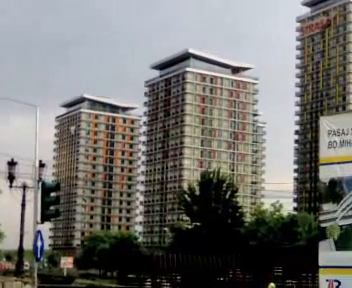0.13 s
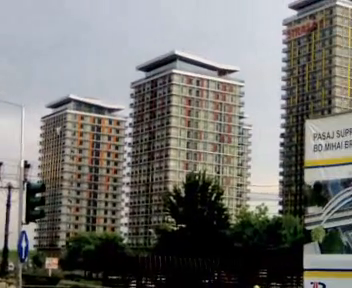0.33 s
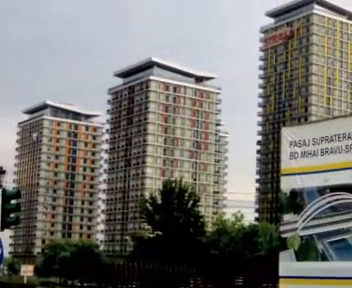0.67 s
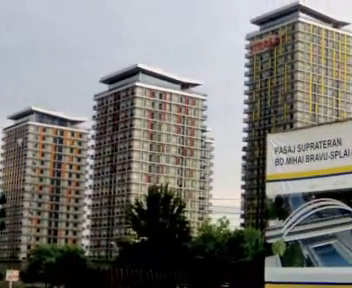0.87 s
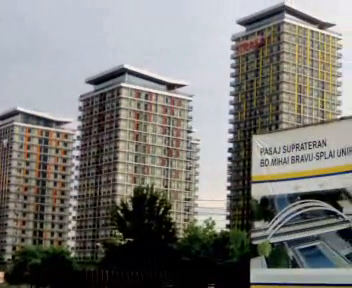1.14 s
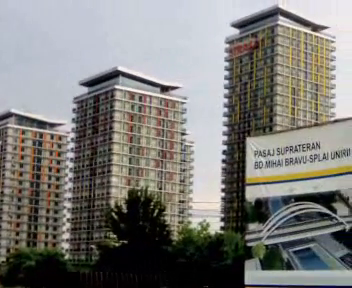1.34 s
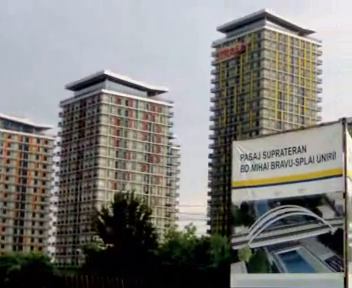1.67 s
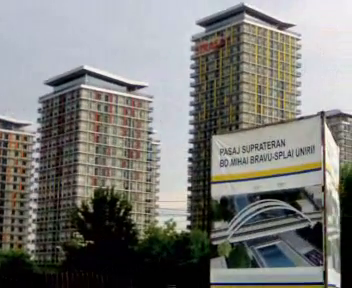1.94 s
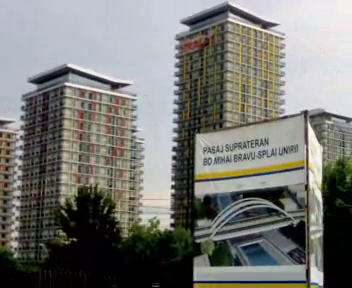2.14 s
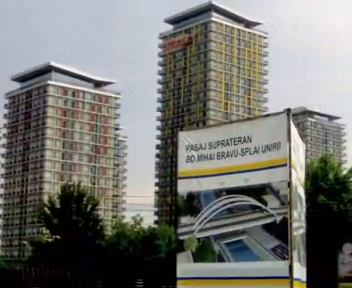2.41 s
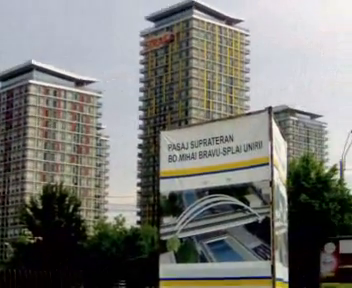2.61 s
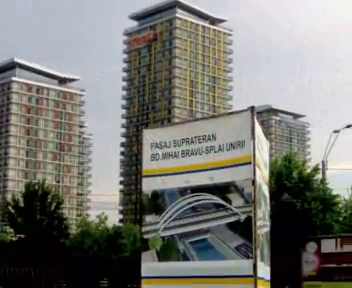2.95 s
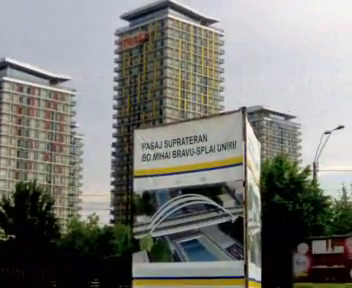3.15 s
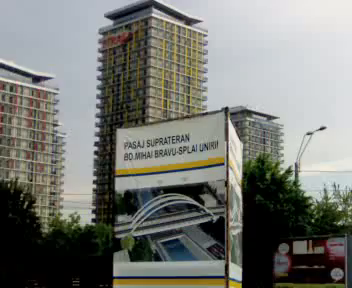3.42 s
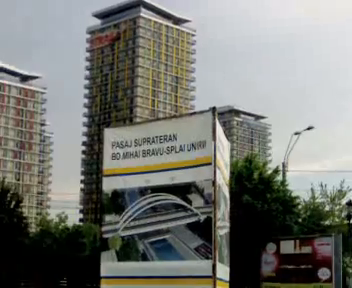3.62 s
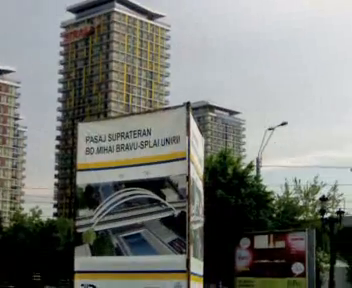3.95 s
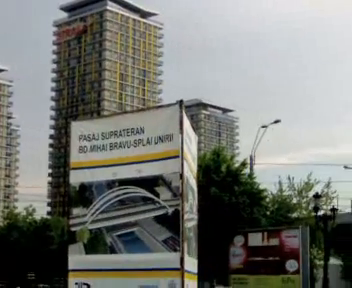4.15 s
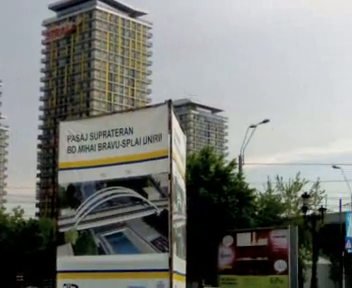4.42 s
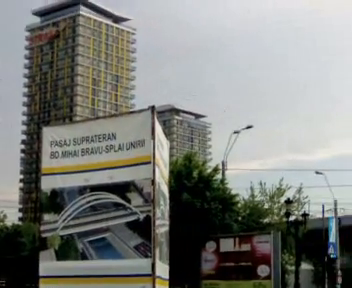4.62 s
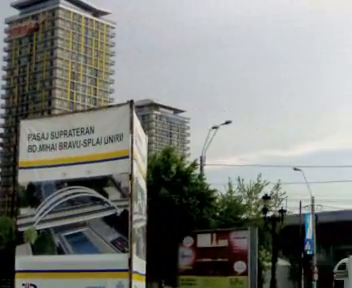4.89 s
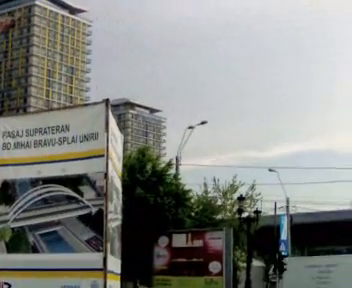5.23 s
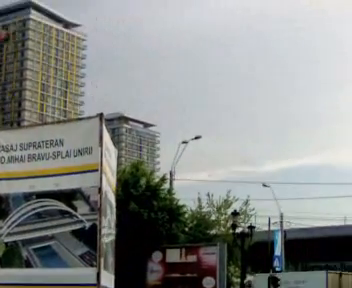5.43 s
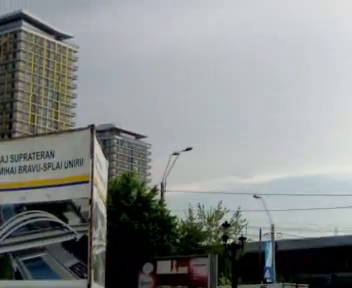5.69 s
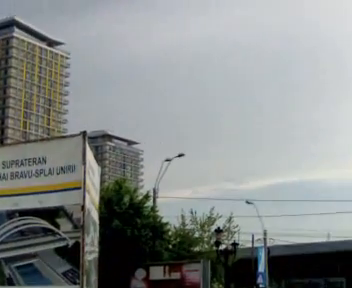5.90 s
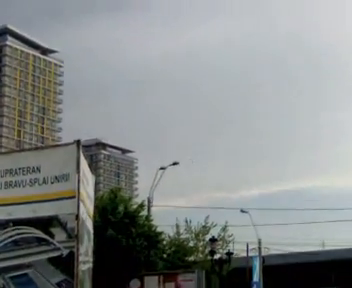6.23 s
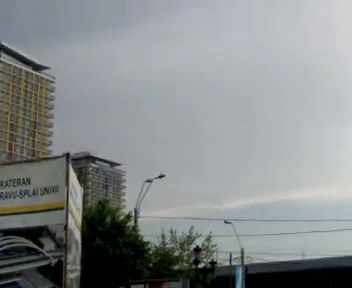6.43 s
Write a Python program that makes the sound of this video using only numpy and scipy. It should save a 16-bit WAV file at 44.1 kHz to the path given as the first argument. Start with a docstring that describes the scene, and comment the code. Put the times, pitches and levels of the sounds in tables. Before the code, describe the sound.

Traffic passes on a rainy street with swelling spray and clacking wheels, fading to a low engine drone and faint raindrop ticks.

```python
"""Traffic on a wet city road.

Heard from the pavement: tyres roar and throw hissing spray as cars go by. Two pass close,
their hiss Doppler-shifted and comb-swept by a reflection. Wheels clatter over a road joint
and raindrops tick nearby. Late on, a car engine swells and fades; a lorry draws up and drones."""
import sys
import numpy as np
from scipy import signal
from scipy.fft import rfft, irfft, next_fast_len
from scipy.io import wavfile
from scipy.ndimage import uniform_filter1d, map_coordinates

SR = 44100
rng = np.random.default_rng(int(sys.argv[2]) if len(sys.argv) > 2 else 0)


def generate_wav(signal):
    """Clip the signal to [-1, 1] and save it as 16-bit WAV at the path in sys.argv[1]."""
    frames = np.transpose(np.atleast_2d(signal))
    scaled = np.clip(frames, -1, 1) * 32767
    pcm = np.round(scaled).astype(np.int16)
    wavfile.write(sys.argv[1], SR, pcm)


N = 289296

# Each row: closest approach in seconds, half-length in seconds, tyre, water and mist levels in dB.
CAR_PASSES = [(1.06, 0.38, -28, -24.5, -28), (2.02, 0.12, -46, -32, -51.5), (3.599, 0.56, -25.5, -25, -25),
              (4.56, 0.18, -36.5, -29.5, -43.5), (5.75, 1, -57.5, -36, -44)]
# Distant traffic, thinning out. Each row: time in seconds, level in dB.
FAR_TRAFFIC = [(0, -23.5), (2.7, -25.5), (4.3, -28.5), (5.5, -32), (6.56, -33)]
# Heavy bodies on uneven road. Each row: peak time in seconds, half-length in seconds, level in dB.
BODY_BOOMS = [(0.101, 0.18, -35), (.75, 0.29, -40.5), (2.3, 0.3, -34), (3.22, .17, -32)]
# Tyre and water noise. Each row: frequency in Hz, relative spectral density in dB.
BOOM_SPECTRUM = [(12, -31.5), (26, 4.5), (42, -10.5), (60, 1), (80, -7), (115, -31)]
RUMBLE_SPECTRUM = [(35, -4.5), (65, 0), (97, -5), (135, -3), (180, -5), (290, -6.5), (420, -9.5),
                   (560, -7.5), (800, -44)]
ROLL_SPECTRUM = [(330, -19), (520, -15.5), (630, -2.5), (720, -0.5), (900, -3), (1100, -5.5), (1500, -27.5),
                 (2500, -65.5)]
TREAD_SPECTRUM = [(400, -39), (750, -14), (1000, -9.5), (1200, -3), (1480, -1.5), (1720, -1.5), (1950, -5),
                  (2350, -6.5), (2900, -15), (4000, -30.5), (7000, -54)]
SPLASH_SPECTRUM = [(900, -17), (1800, -2.5), (2500, 0), (3100, 0), (3700, -3), (4400, -3), (5200, -9.5),
                   (6500, -17), (7400, -45)]
HISS_SPECTRUM = [(2500, -52), (3900, -11.5), (4550, -1), (5020, 1.5), (5300, -2), (5750, -0.5),
                 (6200, -5.5), (6800, -12), (7400, -29.5)]
MIST_SPECTRUM = [(3500, -34.5), (4800, -6.5), (5500, 0), (6200, -4.5), (6700, -8.5), (7150, -10),
                 (7450, -17)]
DROPLET_SPECTRUM = [(600, -20.5), (1600, -7.5), (3500, -2), (5200, 3.5), (6300, -7.5), (7400, -31)]
# Resonances. Each row: centre in Hz, width in Hz, relative gain in dB.
TREAD_BAND = [(1508, 460, 0)]
HISS_BAND = [(5110, 570, 0)]
JOINT_MODES = [(748, 160, 1.5), (927, 120, 4.5), (1420, 210, 6.5), (1750, 290, -4), (2560, 880, -7)]
# Tyres cutting standing water. Each row: peak time in seconds, half-length in seconds, level in dB.
PUDDLES = [(0.661, 0.079, -24), (0.814, .026, -25.5), (1.208, 0.07, -30), (1.363, 0.15, -27.5),
           (1.826, 0.055, -32.5), (3.654, 0.039, -23.5), (3.926, 0.093, -27.5)]
# Pitch fall of the hiss. Each row: midpoint in seconds, half-length in seconds, peak shift as a fraction.
DOPPLER_FALLS = [(1.02, .16, .055), (3.46, .22, .018)]
# Spray reflections. Each row: peak time in seconds, Gaussian sigma in seconds, lag at the peak in ms,
# closing rate in ms per second, signed gain.
REFLECTIONS = [(.85, .2, .63, 1.4, .32), (.9, .11, .183, -1.3, -.22), (3.32, .17, .34, 1.05, -.24),
               (3.42, .13, .41, 1.1, -.13)]
# Wheel hits on the joint. Each row: start in seconds, clack, crack and thud levels in dB, thud in Hz.
JOINT_HITS = [(0.047, -26.5, -26.5, -21, 100), (0.057, -24, -26, -30, 139), (0.070, -12.5, -15, -21, 85),
              (0.086, -13, -19.5, -15, 120), (0.099, -18, -16.5, -13.5, 138),
              (0.135, -27.5, -23.5, -37, 150), (0.210, -16, -22, -24, 227), (0.220, -21.5, -18, -27.5, 130),
              (0.235, -38, -40.5, -20, 134), (0.258, -25, -27, -28, 204), (2.043, -18, -19, -29, 186),
              (2.073, -23, -20.5, -20.5, 118), (2.117, -17, -22.5, -37, 190), (2.149, -20, -27, -27, 230),
              (2.164, -28.5, -25, -18, 153), (2.235, -13, -15.5, -24, 251), (2.241, -23.5, -15, -18, 199),
              (2.256, -15.5, -24, -22.5, 150), (2.322, -14, -20.5, -33, 273), (2.329, -26, -21.5, -26, 200),
              (2.342, -12.5, -17.5, -20.5, 288), (2.361, -26, -13.5, -20.5, 172),
              (2.384, -22, -25, -26, 248), (2.429, -19, -32, -26, 232), (2.516, -20, -25, -27, 180),
              (2.543, -34, -29, -19.5, 137), (2.565, -15, -33.5, -23, 190), (3.298, -26, -19.5, -26, 183),
              (3.631, -30.5, -12.5, -37.5, 150)]
# Contact filters: rubber dulls, the edge sharpens. Each row: frequency in Hz, relative gain in dB.
RUBBER_CONTACT = [(200, -5), (540, -5), (720, -3), (960, -3), (1400, -17), (3000, -30.5), (7000, -48.5)]
EDGE_CONTACT = [(400, -22), (900, -20), (1400, 4.5), (2700, 2), (3600, -9), (7000, -29.5)]
# Each row: peak time in seconds, Gaussian sigma in seconds, centre in Hz, width in Hz, level in dB.
TREAD_TONES = [(0.804, 0.22, 1060, 222, -29.5), (1.261, 0.11, 1450, 520, -24),
               (2.251, 0.25, 762, 172, -33.5), (3.059, 0.32, 1610, 427, -30.5),
               (3.438, 0.17, 590, 145, -31.5), (4.835, 0.33, 1460, 427, -34.5)]
# Each row: start in seconds, level in dB, centre in Hz, 60 dB decay time in seconds.
NEAR_DROPS = [(1.4747, -13, 1980, .012), (1.793, -15.5, 4850, 0.021), (2.4682, -20.5, 5000, 0.017),
              (5.429, -24, 2200, 0.011), (5.451, -27, 4970, 0.015), (5.770, -26.5, 5520, 0.061),
              (6.375, -26.5, 5560, .014)]
# Each row: time in seconds, level in dB.
CAR_ENGINE_LEVEL = [(3.25, -58), (3.42, -30.5), (3.6, -29.5), (3.68, -37), (3.78, -27.5), (3.97, -30.5),
                    (4.11, -35), (4.2, -32), (4.55, -35), (4.88, -41), (4.98, -60)]
# Exhaust harmonics. Each row: multiple of the firing rate, relative level in dB.
CAR_ORDERS = [(1, -1), (2, -13.5), (3, -12.5), (5, -20)]
LORRY_ORDERS = [(1, -2.5), (2, -25), (4, -14)]
# Parts of a pass. Each triple: lead on the car in half-lengths, width ratio, gain in dB.
RUMBLE_SWELL, ROLL_SWELL, TREAD_SWELL = (0.47, 1, -9.5), (0.16, 1, -5), (-0.055, 1, -1.9)
SPLASH_SWELL, HISS_SWELL = (-0.03, 0.92, -0.73), (-0.054, 1.02, 0)
MIST_SWELL, WAKE_SWELL = (0.93, 0.76, 0), (-0.74, 0.2, -4)

TIME_S = np.arange(N) / SR


def amp(db):
    """Decibels to gain."""
    return 10 ** (np.asarray(db) / 20)


def unit_rms(x):
    """Scale to rms 1."""
    return x / np.sqrt(np.mean(x ** 2) + 1e-20)


def level_curve_db(points):
    """Interpolate (s, dB) points per sample."""
    return np.interp(TIME_S, *np.transpose(points))


def wobble(rate_hz):
    """Smooth random curve, rate_hz knots per second."""
    knots = rng.standard_normal(int(N * rate_hz / SR) + 4)
    return map_coordinates(knots, [TIME_S * rate_hz])


def filtered(x, response):
    """Apply a frequency response by FFT."""
    size = next_fast_len(N + SR // 2)
    return irfft(rfft(x, size) * response(np.fft.rfftfreq(size, 1 / SR)), size)[:N]


def coloured(x, spectrum):
    """Shape by (Hz, dB) points on a log frequency axis; rms 1."""
    points_hz, db = np.transpose(spectrum)
    return unit_rms(filtered(x, lambda hz: amp(np.interp(np.log(hz + 1), np.log(points_hz), db))))


def resonate(x, modes):
    """Parallel band-pass resonators; rms 1."""
    def response(hz):
        return sum(amp(db) * 1j * hz * width_hz / (centre_hz ** 2 - hz ** 2 + 1j * hz * width_hz)
                   for centre_hz, width_hz, db in modes)
    return unit_rms(filtered(x, response))


def band_noise(band):
    """Noise through the same resonance twice; rms 1."""
    return resonate(resonate(rng.standard_normal(N), band), band)


def rush(spectrum, patchy_db):
    """Coloured noise with random gain patches in time and frequency; rms 1."""
    bins = signal.stft(rng.standard_normal(N), nperseg=512)[2]
    patches = uniform_filter1d(rng.standard_normal(bins.shape), size=7, axis=0)
    patches = unit_rms(uniform_filter1d(patches, size=10, axis=1))
    noise = signal.istft(bins * amp(patchy_db * patches), nperseg=512)[1][:N]
    return coloured(noise, spectrum)


def patter(per_second, spread_db):
    """Droplet impacts of random time and size; rms 1."""
    sizes = amp(spread_db * np.minimum(rng.standard_exponential(N), 4))
    impacts = (rng.random(N) < per_second / SR) * sizes * rng.choice([-1, 1], N)
    return coloured(impacts, DROPLET_SPECTRUM)


def bursts(starts_s, levels_db, rise_s, t60_s):
    """Attack-decay envelopes, summed in power."""
    power, age_s = np.zeros(N + SR), np.arange(SR // 2) / SR
    attack = 1 - np.exp(-age_s / rise_s)
    for start_s, db in zip(starts_s, levels_db):
        power[round(start_s * SR):][:len(age_s)] += (amp(db - 60 * age_s / t60_s) * attack) ** 2
    return np.sqrt(power[:N])


def swells(sources, falloff=1.7):
    """Envelope of passing sources: pressure goes as distance ** -falloff, powers add."""
    power = np.zeros(N)
    for closest_s, half_s, db in sources:
        distance = np.hypot(1, (TIME_S - closest_s) / half_s)
        power += (amp(db) * distance ** -falloff) ** 2
    return np.sqrt(power)


def passing(cars, part):
    """Envelope of one part of the cars' noise, leading or trailing each car."""
    lead, width, part_db = part
    return swells((at_s - lead * half_s, width * half_s, db + part_db) for at_s, half_s, db in cars)


def traffic(cars, part, far_db):
    """Envelope of passing cars over the distant stream."""
    return np.hypot(passing(cars, part), amp(level_curve_db(FAR_TRAFFIC) + far_db))


def tyres(city_boom_db=-44, city_rumble_db=-36, city_roll_db=-37):
    """Body boom, rumble, hollow roll and air pumped from the tread, over a steady city murmur."""
    cars = [(at_s, half_s, db) for at_s, half_s, db, _, _ in CAR_PASSES]
    heavy_gain = swells(BODY_BOOMS)
    boom = np.hypot(heavy_gain, amp(city_boom_db)) * rush(BOOM_SPECTRUM, patchy_db=0)
    body_gain = np.hypot(amp(-0.5) * heavy_gain, amp(city_rumble_db))
    rumble_gain = np.hypot(traffic(cars, RUMBLE_SWELL, far_db=-13.5), body_gain)
    rumble = rumble_gain * amp(0.89 * wobble(11)) * rush(RUMBLE_SPECTRUM, patchy_db=0.9)
    roll_gain = np.hypot(traffic(cars, ROLL_SWELL, far_db=-10), amp(city_roll_db))
    roll = roll_gain * rush(ROLL_SPECTRUM, patchy_db=1.06)
    tread_note = amp(-10) * band_noise(TREAD_BAND)
    tread_gain = traffic(cars, TREAD_SWELL, far_db=0.5) * amp(0.39 * wobble(25))
    tread = tread_gain * (amp(-1) * rush(TREAD_SPECTRUM, patchy_db=0.93) + tread_note)
    return boom + rumble + roll + tread


def spray():
    """Mist leads and trails each car, splash peaks as it draws level; droplets crackle in the hiss."""
    water = [(at_s, half_s, db) for at_s, half_s, _, db, _ in CAR_PASSES]
    fine = [(at_s, half_s, db) for at_s, half_s, _, _, db in CAR_PASSES]
    puddle_gain = swells(PUDDLES)
    hiss_gain = np.hypot(traffic(water, HISS_SWELL, far_db=-8.5), puddle_gain)
    flutter = amp(0.62 * wobble(24))  # water leaves the tyres in uneven sheets
    splash_gain = np.hypot(traffic(water, SPLASH_SWELL, far_db=-8), amp(-4) * puddle_gain)
    splash = splash_gain * amp(0.5) * flutter * rush(SPLASH_SPECTRUM, patchy_db=0)
    hiss_note = amp(-9.5) * band_noise(HISS_BAND)
    hiss = hiss_gain * flutter * doppler(amp(-0.7) * rush(HISS_SPECTRUM, patchy_db=-0.2) + hiss_note)
    mist_gain = np.hypot(traffic(fine, MIST_SWELL, far_db=-21.5), passing(fine, WAKE_SWELL))
    mist = mist_gain * rush(MIST_SPECTRUM, patchy_db=1)
    droplets = hiss_gain * amp(-8.5) * patter(per_second=650, spread_db=7)
    return reflected(splash + hiss + mist + droplets)


def doppler(x):
    """Pitch is raised as a car approaches, lowered as it leaves."""
    speed = 1 - sum(shift * np.sin(2 * np.arctan((TIME_S - at_s) / half_s))
                    for at_s, half_s, shift in DOPPLER_FALLS)
    return map_coordinates(x, [np.cumsum(speed)], order=3, mode="mirror")


def reflected(x):
    """Reflections with changing lag sweep combs through the spray."""
    for at_s, sigma_s, lag_ms, closing_ms_per_s, peak_gain in REFLECTIONS:
        lag_s = np.abs(lag_ms - closing_ms_per_s * (TIME_S - at_s)) / 1000
        gain = peak_gain * np.exp(-0.5 * ((TIME_S - at_s) / sigma_s) ** 2)
        delayed = map_coordinates(x, [(TIME_S - lag_s) * SR], order=3)
        x = (x + gain * delayed) / np.sqrt(1 + gain ** 2)
    return x


def light_rain():
    """Faint, steady patter of small drops."""
    return amp(-45.5) * patter(per_second=100, spread_db=0.5)


def road_joint():
    """Wheels hit the joint: hollow clack, crack from its edge, thud from the wheel."""
    starts_s, clack_db, crack_db, thud_db, thud_hz = np.transpose(JOINT_HITS)
    clacks = joint_blows(starts_s, clack_db, RUBBER_CONTACT)
    cracks = joint_blows(starts_s, crack_db, EDGE_CONTACT)
    return clacks + cracks + wheel_thuds(starts_s, thud_db, thud_hz)


def joint_blows(starts_s, levels_db, contact, push_db=16, scuff_db=-4, echo_db=-17):
    """A sudden push, a rubber scuff and a faint street echo, through the joint's modes."""
    scuff = bursts(starts_s, levels_db + scuff_db, rise_s=0.00036, t60_s=0.034)
    echo = bursts(starts_s, levels_db + echo_db, rise_s=0.014, t60_s=0.2)
    force = (scuff + echo) * rng.choice([-1, 1], N)
    force[np.round(starts_s * SR).astype(int)] += amp(levels_db + push_db)
    return np.std(force) * coloured(resonate(force, JOINT_MODES), contact)


def wheel_thuds(starts_s, levels_db, pitches_hz, t60_s=0.07):
    """A jolted wheel swings for a few cycles."""
    out, age_s = np.zeros(N + SR), np.arange(SR // 4) / SR
    for start_s, db, hz in zip(starts_s, levels_db, pitches_hz):
        thud = amp(db - 60 * age_s / t60_s) * np.sin(2 * np.pi * hz * age_s)
        out[round(start_s * SR):][:len(thud)] += thud
    return out[:N]


def tread_singing():
    """Uneven tread blocks give fuzzy tones that swell and fade as cars pass."""
    out = np.zeros(N)
    for at_s, sigma_s, hz, width_hz, db in TREAD_TONES:
        envelope = amp(db) * np.exp(-0.5 * ((TIME_S - at_s) / sigma_s) ** 2)
        out += envelope * band_noise([(hz, width_hz, 0)])
    return out


def near_drops(width_hz=1600):
    """Raindrops land close by, each a tick in its own band."""
    return sum(bursts([start_s], [db], rise_s=0.0005, t60_s=t60_s) * band_noise([(hz, width_hz, 0)])
               for start_s, db, hz, t60_s in NEAR_DROPS)


def exhaust(orders, firing_hz, roughness, drift_hz):
    """Harmonics of a slightly unsteady firing rate."""
    phase = 2 * np.pi * np.cumsum(firing_hz + drift_hz * wobble(8)) / SR
    tone = np.zeros(N)
    for order, db in orders:
        gain = amp(db) * (1 + roughness * wobble(14))
        tone += gain * np.sin(order * phase + 2 * np.pi * rng.random())
    return np.sqrt(2) * tone


def car_engine():
    """A passing car's drone swells unevenly and fades."""
    gain = amp(level_curve_db(CAR_ENGINE_LEVEL))
    return gain * exhaust(CAR_ORDERS, firing_hz=57.36, roughness=0.06, drift_hz=0.3)


def lorry_engine(start_s=4.9, rise_s=0.22, level_db=-34):
    """A slow lorry draws up, then drones evenly."""
    gain = amp(level_db) * np.clip((TIME_S - start_s) / rise_s, 0, 1)
    return gain * exhaust(LORRY_ORDERS, firing_hz=32.7, roughness=0.16, drift_hz=0.816)


def scene():
    """The street in mono."""
    cars = tyres() + tread_singing() + spray() + car_engine()
    return (cars + lorry_engine() + road_joint() + near_drops() + light_rain())[None]


def record(dry, cutoff_hz=7480):
    """Brick-wall low-pass."""
    return filtered(dry[0], lambda hz: hz < cutoff_hz)[None]


dry = scene()
out = record(dry)
generate_wav(out)
```